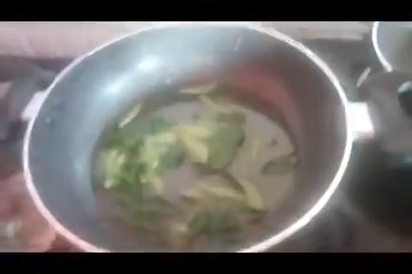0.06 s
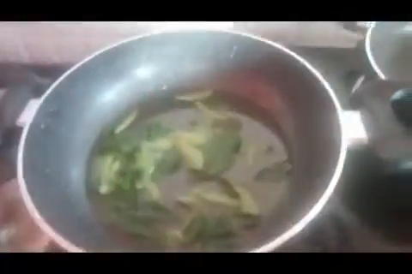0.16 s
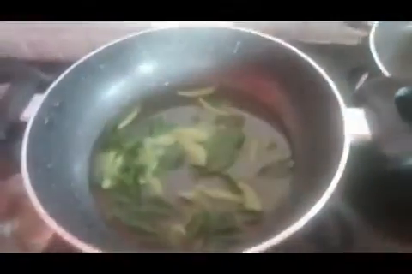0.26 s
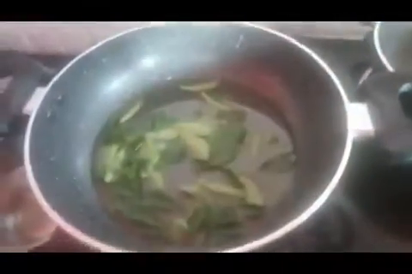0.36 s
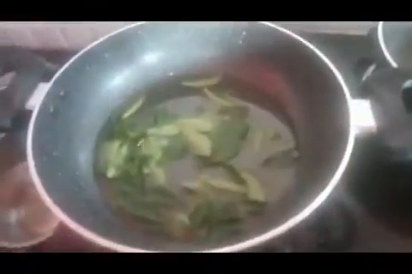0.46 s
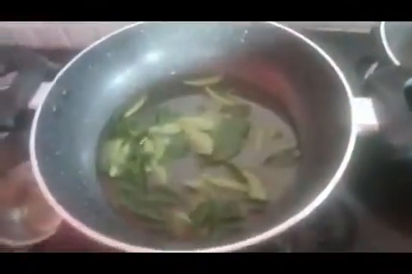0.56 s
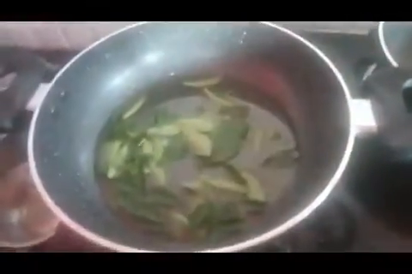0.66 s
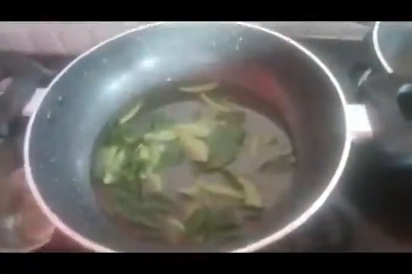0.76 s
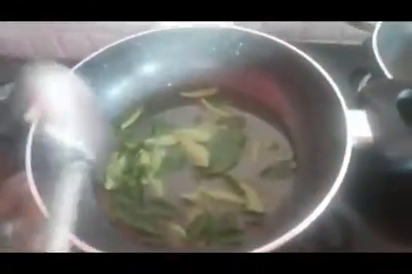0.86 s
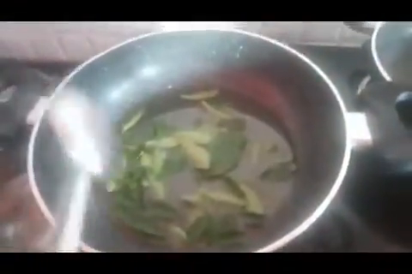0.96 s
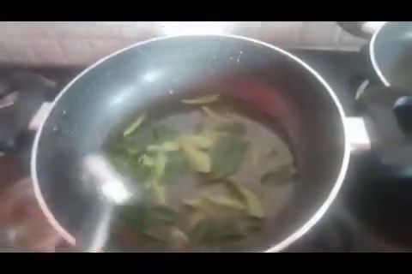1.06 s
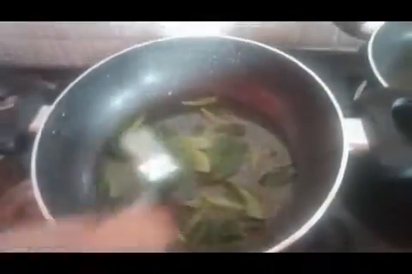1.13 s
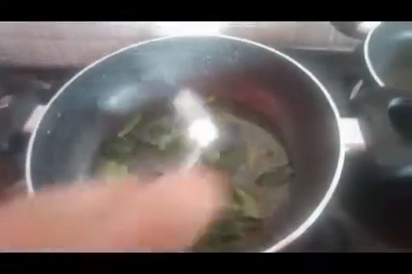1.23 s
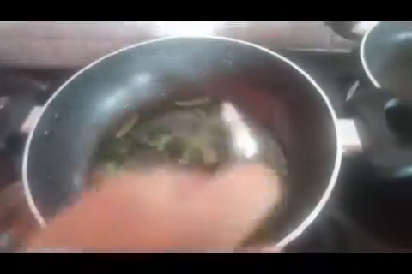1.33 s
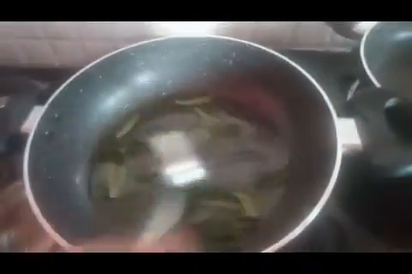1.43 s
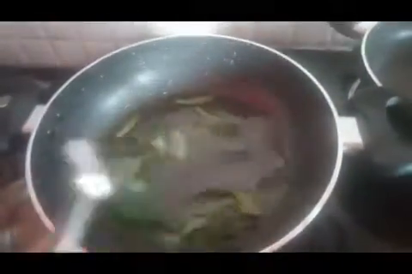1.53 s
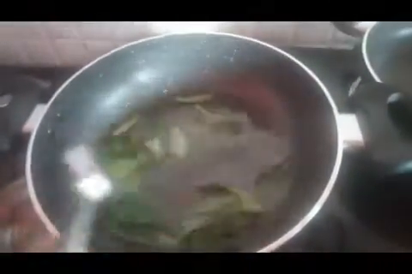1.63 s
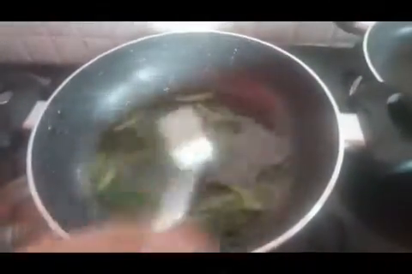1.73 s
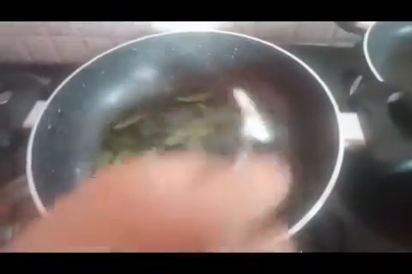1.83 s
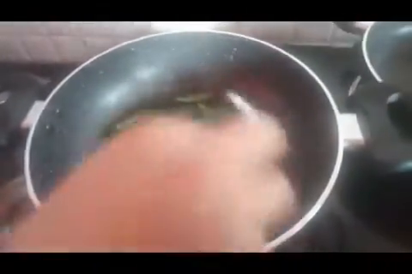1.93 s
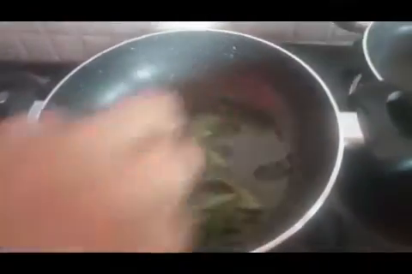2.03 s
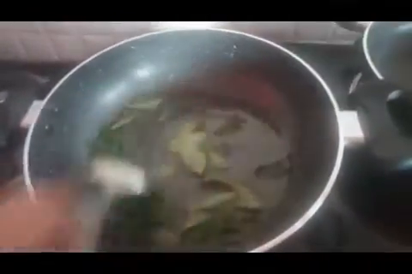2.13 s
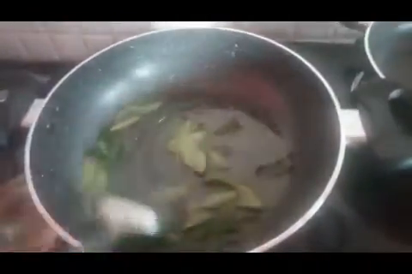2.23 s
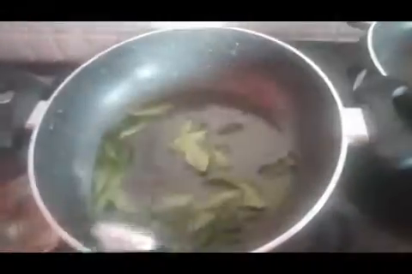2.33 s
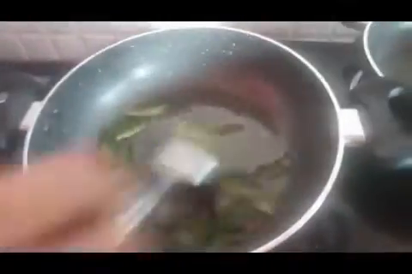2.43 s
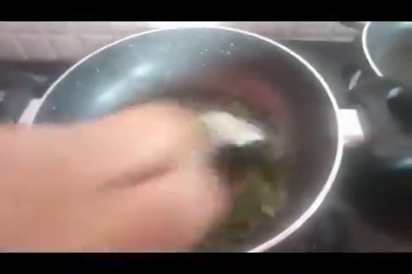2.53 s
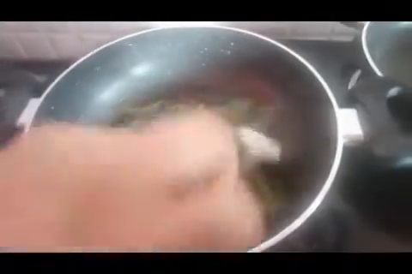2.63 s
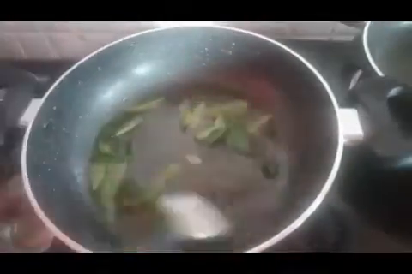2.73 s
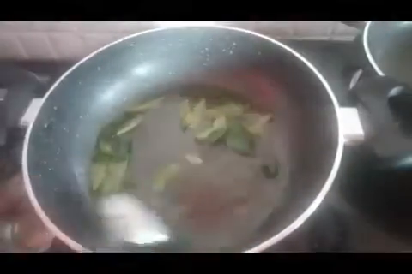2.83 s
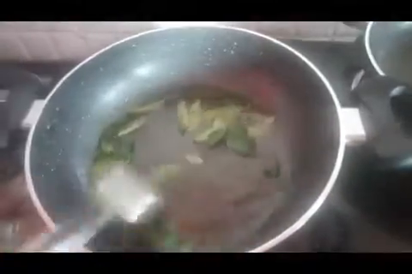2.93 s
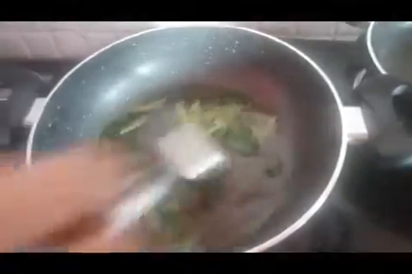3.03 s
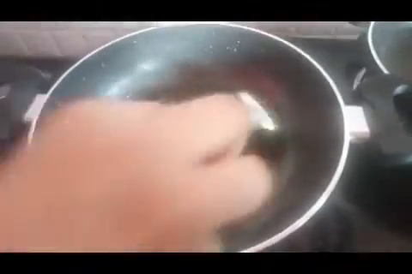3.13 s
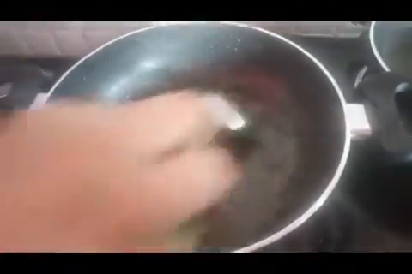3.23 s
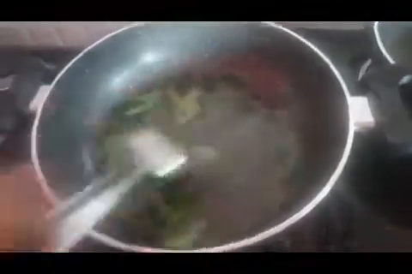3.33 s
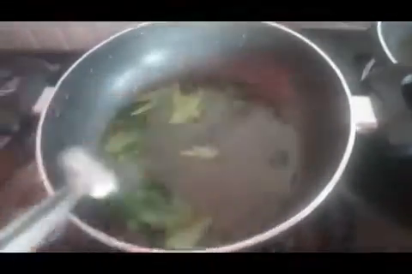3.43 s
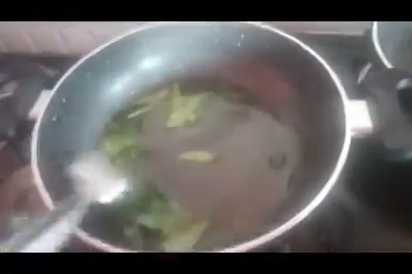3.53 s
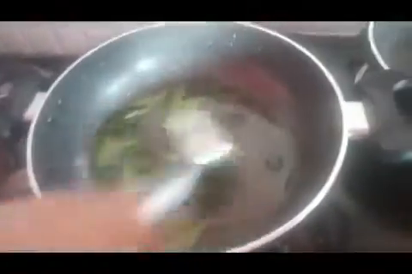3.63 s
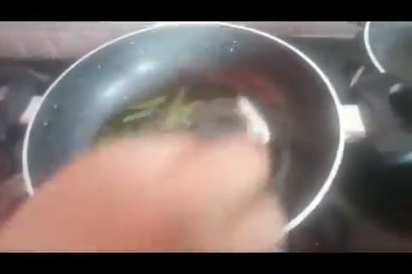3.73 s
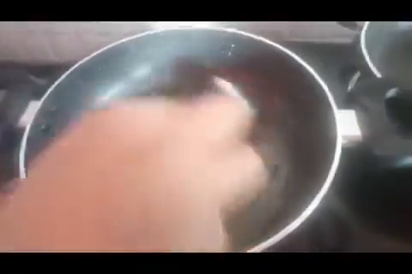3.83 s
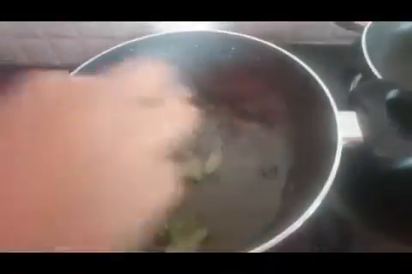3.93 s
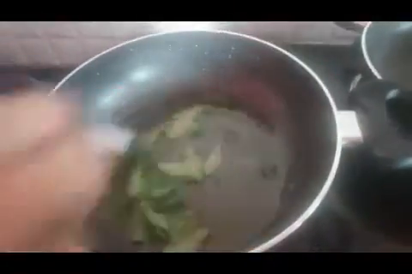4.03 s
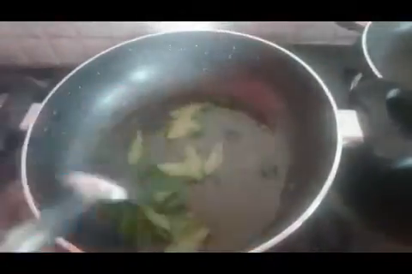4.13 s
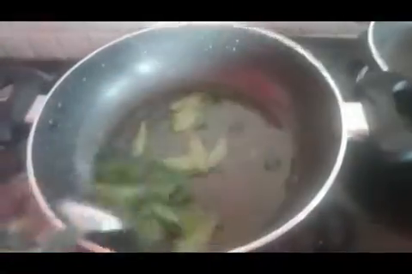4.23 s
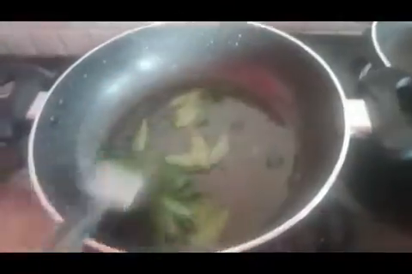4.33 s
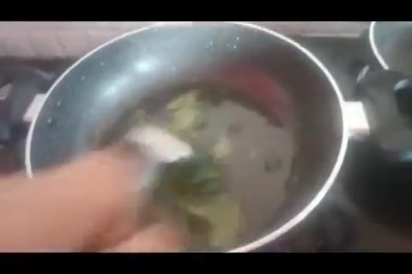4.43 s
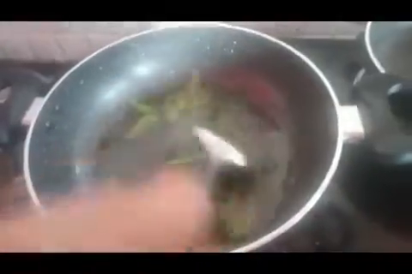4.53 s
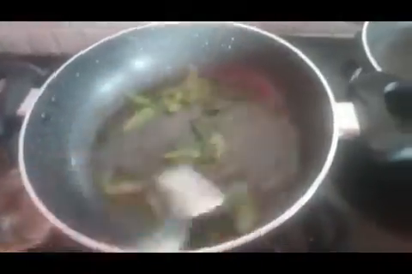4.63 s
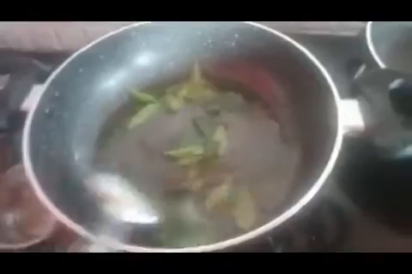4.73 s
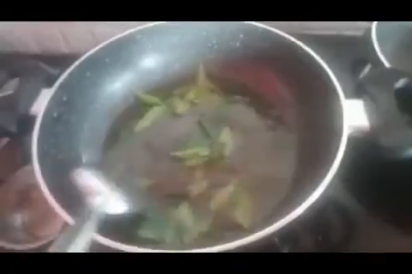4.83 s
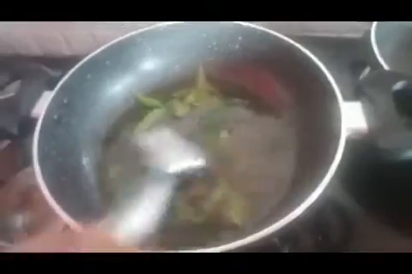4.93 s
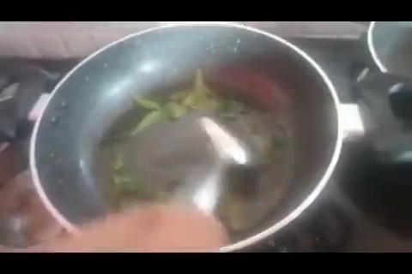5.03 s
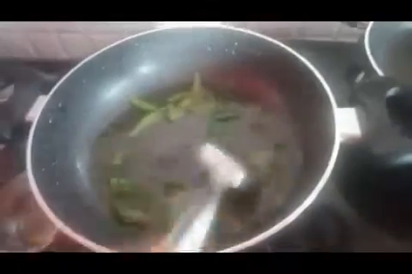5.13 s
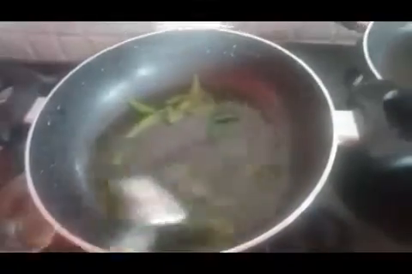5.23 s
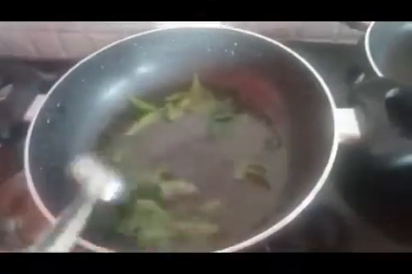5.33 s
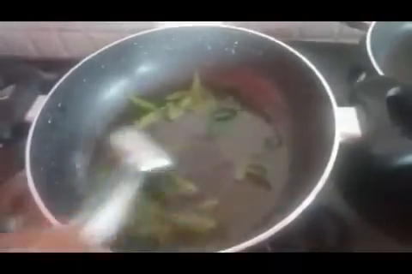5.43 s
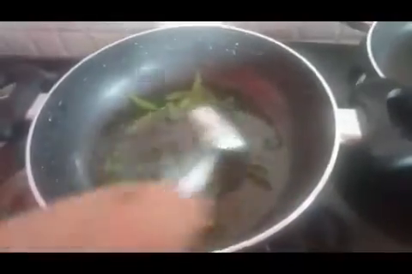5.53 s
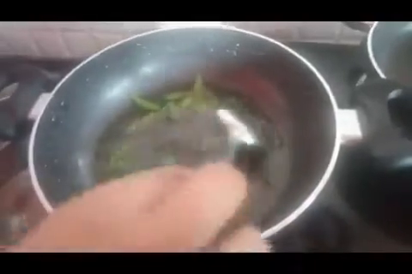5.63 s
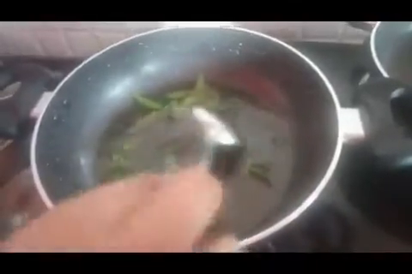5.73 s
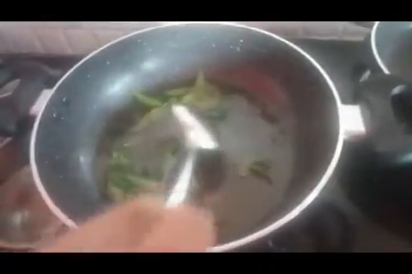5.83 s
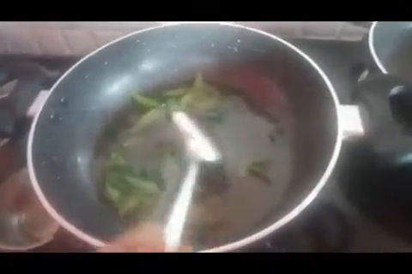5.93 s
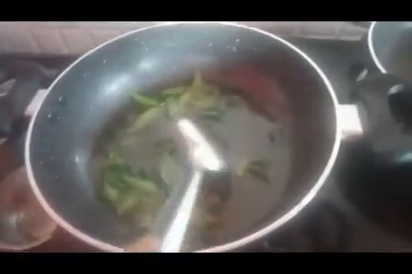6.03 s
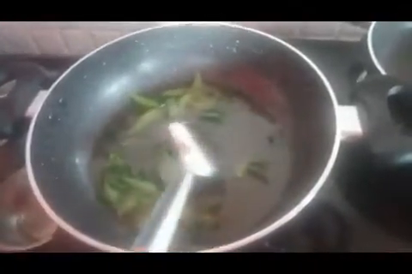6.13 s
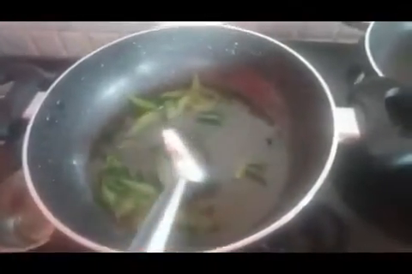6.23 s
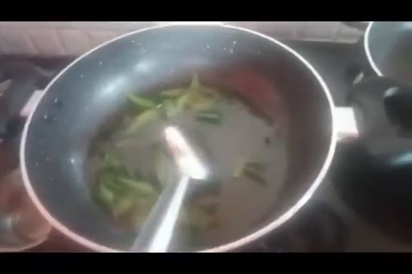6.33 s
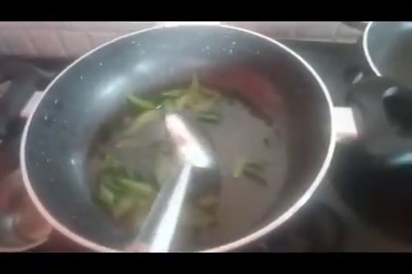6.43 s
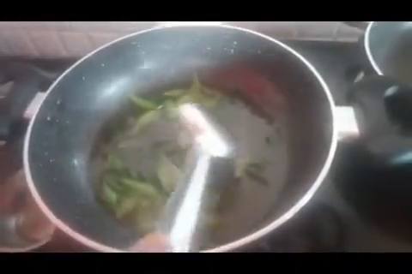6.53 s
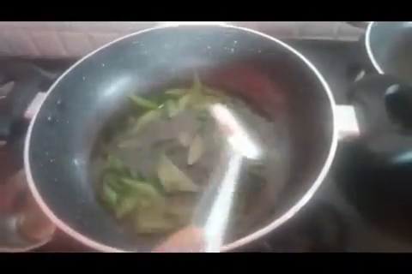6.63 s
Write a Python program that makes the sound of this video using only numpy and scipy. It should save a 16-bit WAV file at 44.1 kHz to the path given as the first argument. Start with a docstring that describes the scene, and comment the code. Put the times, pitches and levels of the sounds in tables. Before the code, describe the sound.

A close handheld mono microphone hears a pan on a hob. Thin, high sizzling runs throughout with ticks and spits of oil. A metal spoon knocks and drags in quick irregular strokes, densest from about two to four and a half seconds, some dull on the pan base, some ringing on the wall. Then sparser knocks, a low thump, and faint fizz over soft fluttering air noise.

```python
"""In a tiled kitchen, a steel spoon stirs a deep coated pan on a hob while leaves fizz, spit and whistle in hot oil.
Knocks, and one accent inside a scrape, are a noise crack with damped pan modes; dragging drives the modes with grit.
Dull thumps on the hob are low damped modes with a puff. Fizz, ticks and short pops are noise and clicks in bands,
and whistles are narrow gliding noise. Knocks, thumps and pops draw a decaying answer from the room.
Under all this lie unsteady, fluttering low air noise and a low shaking that follows the push on the pan base."""
import sys
import numpy as np
from scipy import signal
from scipy.fft import rfft, irfft, next_fast_len
from scipy.io import wavfile
from scipy.ndimage import uniform_filter1d, map_coordinates

SR = 44100
rng = np.random.default_rng(int(sys.argv[2]) if len(sys.argv) > 2 else 0)


def digitize_waveform(pressure):
    """Quantize a signal to 16-bit integers and store it at the path in sys.argv[1].

    Rows of a 2-D input are taken as channels; values are limited to [-1, 1].
    """
    field = np.atleast_2d(pressure).T
    bounded = np.clip(field, -1, 1)
    quanta = np.round(bounded * 32767).astype(np.int16)
    wavfile.write(sys.argv[1], SR, quanta)


N = 293761

# Modes of pan and spoon. Each row: frequency in Hz, relative level in dB, 60 dB decay time in s when struck.
PAN_MODES = [(145, -14, .3), (259, -8, .2), (312, 0, .3), (619, -8, .12), (723, -3, .15), (795, -5, .15),
             (995, -9, .06), (1103, -3, .08), (1170, -6, .07), (1345, -2, .17), (1385, -4, .17),
             (1935, -4, .1), (2010, -4, .12), (2130, -2, .12), (2430, -6, .08), (2690, -4, .08),
             (3080, -4, .06), (3500, -6, .06), (3900, -6, .08), (4950, -7, .08), (6490, -2, .1),
             (9135, 0, .2), (10500, -7, .14), (12900, -4, .14), (13950, -4, .16)]
# Upper limits of pan base, lower wall, upper wall, and spoon with rim; treble lies above.
BASE_HZ, LOWER_HZ, WALL_HZ, TREBLE_HZ = 450, 900, 1600, 7800


def amp(db):
    """Decibels are twenty times the logarithm of an amplitude ratio."""
    return 10 ** (np.asarray(db) / 20)


def unit(x):
    """Normalisation to unit root-mean-square level."""
    return x / np.sqrt(np.mean(x ** 2) + 1e-20)


def along(points, hz):
    """Interpolation of (Hz, value) points on a logarithmic frequency axis."""
    point_hz, values = np.transpose(points)
    return np.interp(np.log(hz + 1), np.log(point_hz + 1), values)


def wobble(rate):
    """A smooth random modulation: a spline through normal knots, rate knots a second."""
    knots = rng.standard_normal(int(N * rate / SR) + 4)
    return map_coordinates(knots, [np.arange(N) * rate / SR])


def filtered(x, response):
    """Linear filtering: the spectrum is multiplied by a complex response of frequency."""
    size = next_fast_len(len(x) + SR // 4)
    spectrum = rfft(x, size) * response(np.fft.rfftfreq(size, 1 / SR))
    return irfft(spectrum, size)[:len(x)]


def coloured(x, spectrum):
    """Spectral shaping by (Hz, relative dB) points, then unit level."""
    return unit(filtered(x, lambda hz: amp(along(spectrum, hz))))


def grit(rate, spread_db):
    """Impulsive excitation: random clicks, rate a second, a few of them much larger."""
    chance, sign, size = rng.random((3, N))
    clicks = (chance < rate / SR) * np.sign(sign - .5)
    return unit(clicks * amp(-spread_db * np.log(1 - size)))


def add(track, s, sound):
    """Superposition of a sound onto a track from time s in seconds."""
    track[round(s * SR):][:len(sound)] += sound


def part(hz):
    """Modes grouped by frequency: 0 base, 1 lower wall, 2 upper wall, 3 spoon and rim, 4 treble."""
    return np.searchsorted([BASE_HZ, LOWER_HZ, WALL_HZ, TREBLE_HZ], hz)


def kitchen(x, delay=0.011):
    """Reverberation: convolution with noise, new for every sound, whose decay time depends on frequency."""
    # Each row: frequency in Hz, 60 dB decay time in s.
    reverb_times = [(150, 0.36), (700, 0.37), (2000, 0.39), (6000, 0.2), (14000, 0.19)]
    hz, t, z = signal.stft(rng.standard_normal(SR // 2), SR, nperseg=256)
    decay = amp(-60 * t / along(reverb_times, hz)[:, None])
    tail = signal.istft(z * decay, SR, nperseg=256)[1]
    # The first walls are some metres away, so the answer builds up over the delay (s).
    tail *= np.clip(np.arange(len(tail)) / SR / delay, 0, 1) ** 2
    return signal.fftconvolve(x, tail / np.linalg.norm(tail))


def ring(modes, t, scatter_db, rough):
    """Modal ringing, one decaying sine per row; hand, oil and hob damp it unevenly, so its phase wanders."""
    hz, db, t60 = np.transpose(modes)[..., None]
    luck, phase = rng.standard_normal(hz.shape), rng.random(hz.shape)
    wander = rough * np.cumsum(rng.standard_normal((len(hz), len(t))), axis=1)  # in turns
    envelope = amp(db + scatter_db * luck - 60 * t / t60)
    return envelope * np.sin(2 * np.pi * (hz * t + phase + wander))


def strokes():
    """Excitation envelopes: the drive of each part of the pan swells, sags while held, then dies faster."""
    # Strokes of the spoon; the last row is the pan singing faintly under the oil.
    # Each row: time of full drive in s, swell length in s, hold length in s,
    # then drive level in dB, before the mix, for rasp, upper wall, pan base and steel treble.
    drag_strokes = [(0.26, 0.013, 0.011, -40, -50.5, -78, -53.5), (0.324, .02, 0.011, -49, -51, -83, -59),
                    (0.387, 0.026, 0.0057, -52.5, -65.5, -85, -59.5),
                    (1.14, 0.22, 0.03, -66, -61.5, -64, -58), (1.378, 0.0092, .014, -42.5, -32, -42, -65),
                    (1.453, 0.077, 0.012, -40.5, -65.5, -55.5, -46),
                    (1.617, 0.011, 0.033, -40.5, -51.5, -23, -70),
                    (1.725, 0.033, 0.075, -44.5, -41.5, -31.5, -60),
                    (1.9, 0.017, 0.027, -22, -26.5, -23, -47.5), (1.966, 0.066, .05, -28, -31, -37, -28),
                    (2.041, .04, 0.088, -21.5, -10, -35, -39.5),
                    (2.281, 0.013, 0.018, -21.5, -32, -22.5, -40.5),
                    (2.608, 0.009, 0.071, -25, -25, -35.5, -36.5),
                    (2.706, 0.074, .035, -29, -19, -38, -39.5),
                    (2.873, 0.0042, 0.0078, -45.5, -56.5, -21, -55.5),
                    (3.153, 0.015, 0.037, -47.5, -47.5, -23.5, -68),
                    (3.279, 0.013, .02, -44.5, -32, -56.5, -59), (3.487, .01, 0.043, -33.5, -26, -19, -54),
                    (3.657, 0.021, 0.019, -49.5, -43, -46, -86),
                    (3.757, 0.017, 0.037, -22.5, -37, -21, -39.5),
                    (3.858, 0.098, .07, -38, -29, -31.5, -31.5),
                    (3.987, 0.093, .04, -21.5, -14, -37.5, -46.5),
                    (4.236, 0.014, 0.05, -18.5, -32, -22.5, -22.5),
                    (4.471, 0.022, 0.007, -35, -51.5, -34, -48),
                    (4.653, 0.091, 0.064, -48, -50.5, -58.5, -60),
                    (4.785, 0.0081, 0.16, -38, -42.5, -29, -56),
                    (4.953, 0.013, 0.031, -44, -67, -38.5, -62),
                    (5.064, 0.012, 0.014, -39, -27, -46.5, -84), (5.35, .01, 0.037, -59.5, -53, -39, -77),
                    (5.615, .01, 0.092, -26.5, -20.5, -31.5, -47),
                    (6.19, 0.031, 0.5, -60.5, -59.5, -63.5, -66)]
    # Fall in dB per second during the hold: rasp, upper wall, lower wall, base, treble.
    sag = np.array([50, 41, 40.5, 60, 50])[:, None]
    # Fall in dB per second after the hold, as the spoon lifts from a stroke, in the same order.
    lift = np.array([205, 278, 181, 171, 236])[:, None]
    swell_db = 28.5  # how far the drive climbs during the swell
    lower_db = -10.5  # the lower wall's share of what moves upper wall and base
    force = np.zeros((5, N + SR))
    for s, swell, hold, rasp_db, upper_db, base_db, steel_db in drag_strokes:
        t = np.arange(SR) / SR - swell
        shape_db = swell_db * np.minimum(t / swell, 0)
        shape_db = shape_db - sag * np.clip(t, 0, hold) - lift * np.maximum(t - hold, 0)
        rasp, upper, base, steel = amp([rasp_db, upper_db, base_db, steel_db])
        lower = amp(lower_db) * np.hypot(upper, base)
        full = np.array([rasp, upper, lower, base, steel])[:, None]
        add(force.T, s - swell, (full * amp(shape_db)).T)
    return force[:, :N]


def room_tone():
    """Forced vibration: the hob shakes as the pan base is pushed, over unsteady, fluttering low air noise."""
    # Each row: frequency in Hz, relative level in dB.
    rumble_spectrum = [(30, -43.5), (60, -13), (100, -16.5), (145, -9.5), (200, -9), (260, -47.5)]
    # Kitchen air. Each row: frequency in Hz, relative level in dB.
    air_spectrum = [(20, -3.5), (50, 12), (90, 15), (160, 2.5), (800, -9), (2400, -8.5), (3200, -51)]
    air_db = -66.5
    push = uniform_filter1d(strokes()[3], size=SR // 30) ** 0.96
    shaking = amp(np.clip(5 * wobble(24), -9, 9)) * rng.standard_normal(N)
    shake = amp(-28.5) * push * coloured(shaking, rumble_spectrum)
    air = coloured(amp(5.7 * wobble(16.0)) * rng.standard_normal(N), air_spectrum)
    return shake + amp(air_db) * air


def oil():
    """Bubble noise: dense tiny bubbles fizz and larger ones tick; short pops are bursts of band noise."""
    # Spectrum of the fizz. Each row: frequency in Hz, relative level in dB.
    fizz_spectrum = [(700, -37.5), (2300, -16), (2900, -0.5), (4000, 2), (6800, 2.5), (7400, -8),
                     (8400, -23.5), (9500, -10.5), (11300, -10), (13500, -14.5), (15600, -0.5),
                     (15850, -6.5), (16100, -57.5)]
    # Fizz over time. Each row: time in s, level in dB before a common gain.
    fizz_levels = [(0, -67), (1.2, -63), (4.6, -61), (6.0, -63), (6.66, -64.5)]
    # Centre frequencies in Hz of the bands where small bubbles tick.
    tick_bands = [3660, 5750, 6600, 9100, 11500, 15000]
    # Short pops: oil spits and a few light taps of the spoon.
    # Each row: start in s, level in dB before a common cut, pitch in Hz.
    pops = [(0.2974, -45, 2130), (0.679, -46, 5650), (0.8435, -42, 15200), (0.8769, -53, 6960),
            (1.1486, -15.5, 3140), (1.199, -31, 3600), (2.3594, -34, 2240), (5.074, -14, 1930),
            (5.1174, -32, 6250), (5.149, -26, 5800), (5.498, -34, 5750), (5.7756, -29, 6140),
            (5.888, -32.5, 5040), (6.1876, -27.5, 5630), (6.2966, -37, 3790), (6.4213, -41, 3750)]
    top_hz = 15900  # ticks and pops stop here
    surge = amp(2.4 * wobble(0.93) + 2.4 * wobble(25))
    bubbles = rng.standard_normal(N) + 0.96 * grit(1500, spread_db=3.0)
    fizz = unit(surge * coloured(bubbles, fizz_spectrum))
    for tick_hz in tick_bands:
        band = lambda hz: np.exp(-((hz / tick_hz - 1) / 0.36) ** 2) * (hz < top_hz)
        fizz += amp(-19.5) * unit(filtered(grit(21, spread_db=1.0), band))
    out, t = np.zeros(N + SR), np.arange(SR // 40) / SR
    for s, db, pitch_hz in pops:
        detune = lambda hz: (hz / pitch_hz - pitch_hz / (hz + 1)) / .6
        near = lambda hz: 1 / (1 + detune(hz) ** 2) * (hz < top_hz)
        burst = unit(filtered(rng.standard_normal(len(t)), near))
        pop = amp(db - 13.5 - 60 * t / 0.032) * burst
        add(out, s, pop)
        add(out, s, amp(-15) * kitchen(pop))
    times, levels_db = np.transpose(fizz_levels)
    level = amp(np.interp(np.arange(N) / SR, times, levels_db, -150, -150))
    return amp(4.5) * level * fizz + out[:N]


def thumps():
    """Soft impact of pan or handle on the hob: low, quickly damped modes and a dull puff."""
    # Each row: start in s, level in dB.
    blows = [(0.105, -48), (0.126, -44), (3.458, -38.5), (5.971, -48), (6.004, -16), (6.018, -27),
             (6.042, -29), (6.063, -26.5), (6.086, -32.5), (6.186, -43)]
    # Modes of a blow. Each row: frequency in Hz, relative level in dB, 60 dB decay time in s.
    thump_modes = [(136.7, -17, 0.27), (335, -6, 0.013), (495, -0.5, 0.029), (587.5, -1, 0.064)]
    out, t = np.zeros(N + SR), np.arange(SR // 4) / SR
    dull = lambda hz: hz / 100 / (1 + (hz / 500) ** 3)
    for s, db in blows:
        puff = unit(filtered(rng.standard_normal(len(t)), dull))
        modes = ring(thump_modes, t, scatter_db=1.0, rough=.008).sum(0)
        dry = modes + amp(-15 - 60 * t / 0.12) * puff
        dry *= amp(db) * np.clip(t / .002, 0, 1) ** 2  # soft onset over 2 ms
        add(out, s, dry)
        add(out, s, amp(-16) * kitchen(dry))
    return out[:N]


def patchy(x, patchy_db):
    """Time-varying colour: gain patches, some 400 Hz by 40 ms, because the contact point moves."""
    z = signal.stft(x, nperseg=512)[2]
    field = uniform_filter1d(rng.standard_normal(z.shape), size=5, axis=0)
    field = uniform_filter1d(field, size=7, axis=1)
    return unit(signal.istft(z * amp(patchy_db * unit(field)), nperseg=512)[1][:N])


def drag():
    """Stick-slip friction: grit feeds the modes of the pan, a broad rasp and, at the end, a faint ring."""
    # Spectrum of the rasp. Each row: frequency in Hz, relative level in dB.
    rasp_spectrum = [(700, -19.5), (1400, -12), (2100, -3), (3200, 0), (5400, -7), (6500, -5), (7300, -18),
                     (8500, -32.5), (15800, -32), (16100, -93)]
    # Spectrum of the finest grit. Each row: frequency in Hz, relative level in dB.
    sheen_spectrum = [(7000, -43.5), (8500, -25), (13600, -1), (15300, 9.5), (16100, -42)]
    judder = amp(0.693 * wobble(55))  # shared by all slips

    def slip():
        """Stick-slip as judder-modulated random clicks."""
        return unit(judder * amp(1.74 * wobble(140)) * grit(5000, spread_db=2.5))

    def sing(force, parts, damp):
        """Driven resonance: grit scaled by this force builds up long-ringing modes most."""
        modes = [m for m in PAN_MODES if part(m[0]) in parts]

        def body(hz):
            """Sum of second-order resonances."""
            return sum(amp(db) * t60 * 1j * hz / (mode_hz * mode_hz - hz * hz + 1j * hz * damp / t60)
                       for mode_hz, db, t60 in modes)

        return unit(filtered(force * slip(), body)) * np.sqrt(np.mean(force ** 2))

    rasp, upper, lower, base, steel = strokes()
    scrape = rasp * patchy(coloured(slip(), rasp_spectrum), patchy_db=3.5)
    edge = amp(-5.5) * scrape + amp(-10.5) * sing(rasp, [3], damp=3.1)
    treble = amp(-15.5) * steel * coloured(slip(), sheen_spectrum)
    treble += amp(-15.5) * sing(steel, [4], damp=20)
    pan = sing(upper, [2], damp=3.5) + sing(lower, [1], damp=3.05) + sing(base, [0], damp=3.25)
    # The pan's ringing is kept dull: little sounds above 4 kHz.
    pan = filtered(pan, lambda hz: 1 / (1 + (hz / 4000) ** 2))
    return edge + treble + amp(-7.0) * pan


def knocks():
    """Impact excitation: a short crack, then modes; where the spoon lands sets each part's share."""
    # Knocks, and one accent inside a scrape (at 3.9816 s).
    # Each row: time in s, level in dB, then settings in dB relative to it, before fixed offsets,
    # for upper wall, bend of the wall, lower wall and treble.
    hits = [(0.2734, -33.5, -31, -30, -12, -14), (0.3281, -42, -14, -18, -48, -13),
            (0.397, -30.5, -52.5, -40, -35, -8.5), (1.369, -25, 12.5, -4, 4.5, -36),
            (1.595, -26, -6.5, -9.5, 7.5, -14), (1.66, -23.5, -8.5, 5, -3, -25.5),
            (1.724, -15, -7, 1, -8.5, -25), (1.8868, -7.5, -34.5, -29, -15, -23.5),
            (2.259, -8.5, -6.5, -20, -15, -12), (2.2928, -8.5, -14, -14, -45, -15.5),
            (2.3163, -16.5, -5.5, -5.5, -5, -21), (2.506, -24.5, -5, 8.5, -0.5, -39.5),
            (2.591, -9, -2.5, -10, -6, -17), (2.8686, -9.5, -11.5, -14.5, -13, -15.5),
            (3.0897, -27, -2.5, 9.5, -1, -41), (3.151, -12.5, -13.5, -4.5, -3.5, -20.5),
            (3.3151, -38.5, -10, -12.5, 6, -13.5), (3.478, -9.5, -4.5, -10.5, -2.5, -15.5),
            (3.6438, -29.5, -5, 10, 2, -31), (3.7455, -8.5, -5.5, -14, -17, -28),
            (3.949, -11.5, -12, -18, -17, -19.5), (3.9816, -10.5, -3, -16.5, -18.5, -34),
            (4.2257, -6, -15.5, -23, -21, -10.5), (4.4636, -26, -5, 6, -1.5, -34),
            (4.7569, -20, -11.5, -25, -10.5, -13), (4.8226, -29, -41, -34, 6.5, -13),
            (4.8928, -27.5, -53, -36, -20, -16), (4.9548, -22, -8.5, 3, -7, -27),
            (5.0632, -31.5, 18.5, 8, 14.5, -39), (5.3453, -42, -12, -20, 11, -9),
            (5.5416, -19.5, -9, 1, -2.5, -48), (5.605, -8, -13.5, -16.5, -16.5, -24.5)]
    # Spectrum of the crack. Each row: frequency in Hz, relative level in dB.
    crack_spectrum = [(200, -47.5), (600, -7), (1700, -2), (2700, 6), (6000, -0.5), (6550, 5.5),
                      (8000, -20.5), (11000, -25), (15500, -26), (16900, -60.5)]
    bend_hz = 1250  # the bend's modes lie between LOWER_HZ and this
    out, t = np.zeros(N + SR), np.arange(int(.4 * SR)) / SR
    hz = np.transpose(PAN_MODES)[0]
    in_bend = (hz > LOWER_HZ) & (hz < bend_hz)
    onset = 1 - np.exp(-t / 0.0025)
    crack_shape = np.exp(-(t / 0.0041) ** 2) + 0.17 * amp(-60 * t / 0.1)
    crack_shape *= 1 - np.exp(-t / 0.002)
    for s, db, upper_db, bend_db, lower_db, treble_db in hits:
        wall_db = max(upper_db, bend_db)
        soft = max(wall_db + 7.0, 0)  # a flat landing moves the wall more and the rim less
        share = np.array([lower_db - 10, lower_db - 4.5, upper_db - 9.0, -18 - soft / 2, treble_db - 24])
        share = np.where(in_bend, bend_db - 6, share[part(hz)])
        modes = amp(share) @ ring(PAN_MODES, t, scatter_db=4, rough=0.0066)
        modes *= onset
        crack = coloured(rng.standard_normal(len(t)), crack_spectrum)
        # Flat, soft contacts sound duller.
        tone = [(700, lower_db + 10.5), (1400, wall_db + 9), (2300, 0.18 * wall_db + 3),
                (3200, -soft / 2), (7200, -soft), (8500, treble_db + 24)]
        crack = filtered(crack, lambda hz: amp(along(tone, hz)))
        dry = amp(db) * (modes + amp(-1.5) * crack * crack_shape)
        add(out, s - .001, dry)
        add(out, s - .001, amp(-9.5) * kitchen(dry))
    return out[:N]


def whistles():
    """Narrow-band noise on a gliding carrier: steam whistling out of a leaf flutters, swells and fades."""
    # Each row: start in s, end in s, first and last pitch in Hz, bandwidth in Hz, level in dB before the fades.
    jets = [(0.844, 0.96, 6940, 7030, 120, -59.5), (1.754, 1.891, 4160, 3770, 800, -42),
            (4.594, 4.78, 4170, 4150, 1100, -47), (5.86, 6.001, 3880, 3880, 120, -60),
            (6.265, 6.426, 3340, 3400, 151.4, -68), (6.401, 6.555, 3820, 3830, 149, -61.5)]
    out = np.zeros(N + SR)
    for start, end, first_hz, last_hz, width_hz, db in jets:
        n = int((end - start) * SR)
        narrow = lambda hz: np.exp(-(2 * hz / width_hz) ** 2)
        a = filtered(rng.standard_normal(n), narrow)
        b = filtered(rng.standard_normal(n), narrow)
        turn = 2 * np.pi * np.cumsum(np.linspace(first_hz, last_hz, n)) / SR
        tone = unit(a * np.cos(turn) + b * np.sin(turn))
        add(out, start, amp(db) * tone * np.sqrt(np.hanning(n)))
    return out[:N]


def scene():
    """Superposition of all sources in one channel."""
    return (room_tone() + oil() + thumps() + drag() + knocks() + whistles())[None]


def record(dry):
    """Band limiting: the small microphone drops the deepest bass, the recorder all above its limit."""
    bass_hz, top_hz = 45, 16900

    def response(hz):
        """Two first-order high-passes and a sharp upper cutoff."""
        return (hz < top_hz) * (1j * hz / bass_hz / (1 + 1j * hz / bass_hz)) ** 2

    return filtered(dry[0], response)[None]


dry = scene()
out = record(dry)
digitize_waveform(out)
```